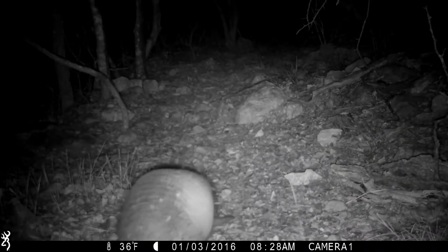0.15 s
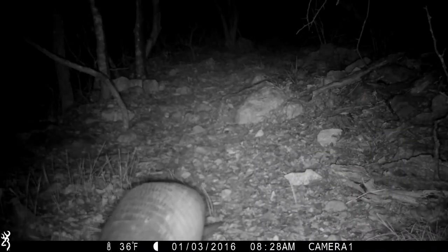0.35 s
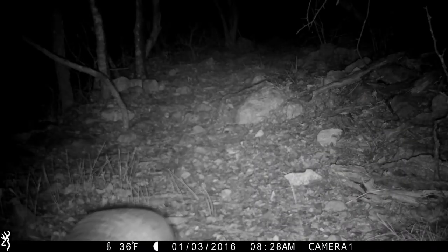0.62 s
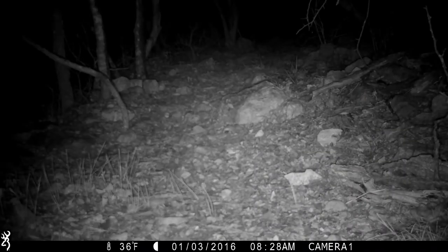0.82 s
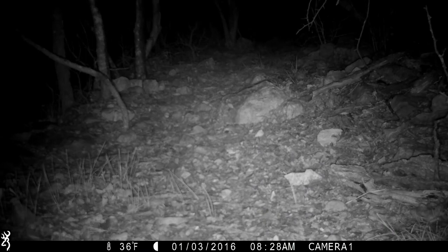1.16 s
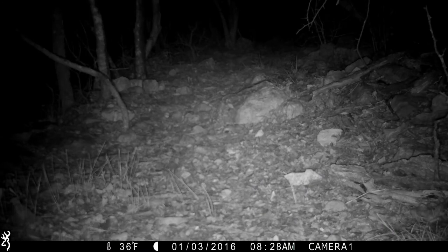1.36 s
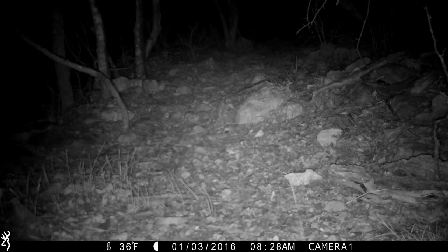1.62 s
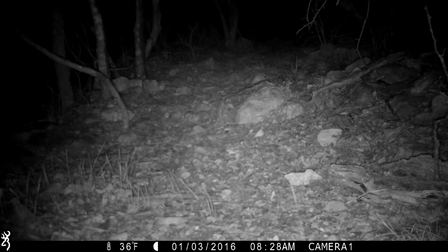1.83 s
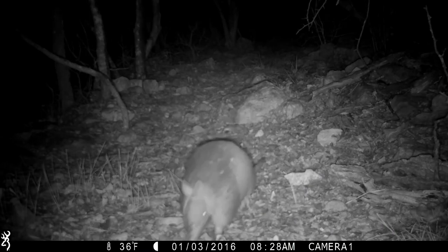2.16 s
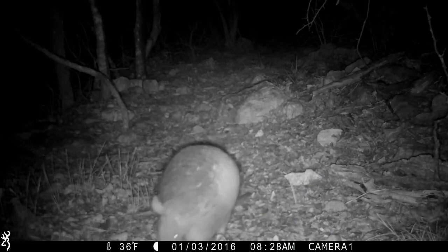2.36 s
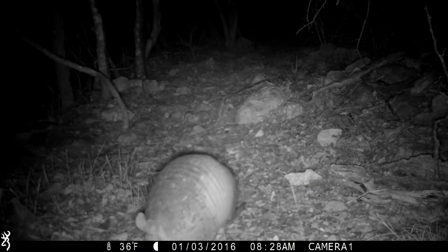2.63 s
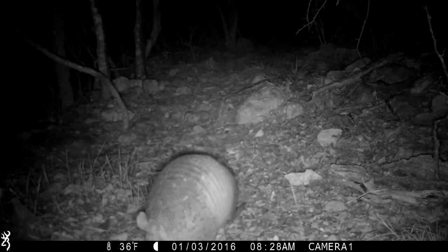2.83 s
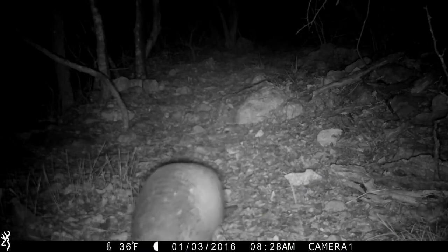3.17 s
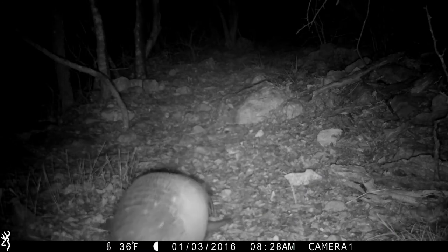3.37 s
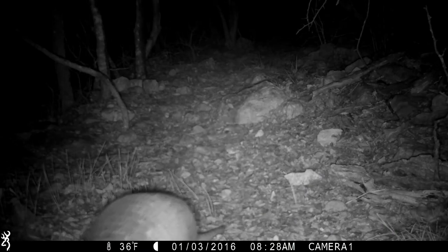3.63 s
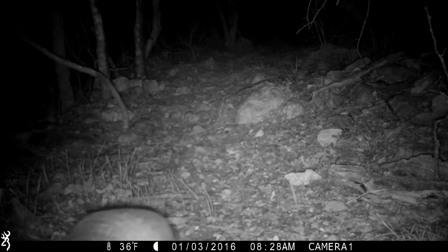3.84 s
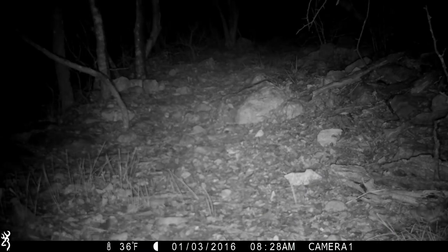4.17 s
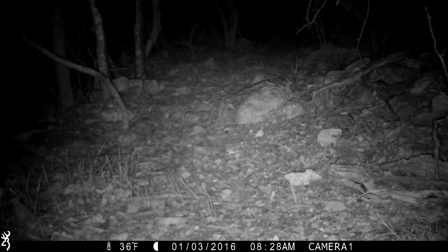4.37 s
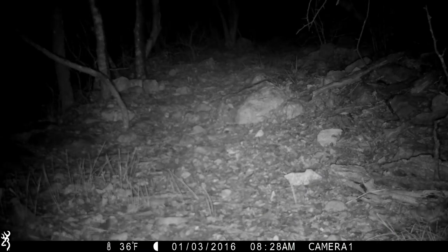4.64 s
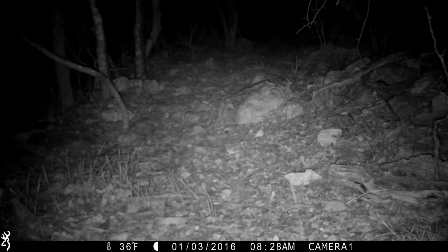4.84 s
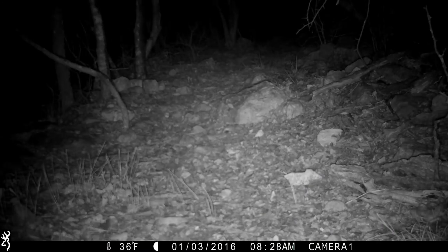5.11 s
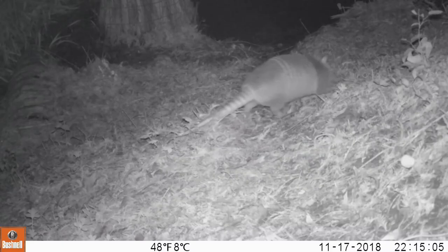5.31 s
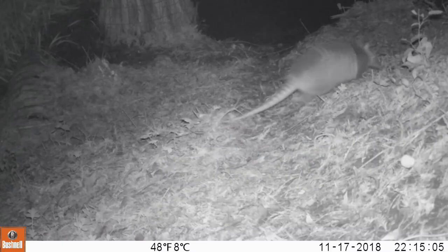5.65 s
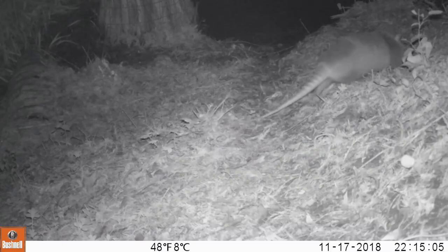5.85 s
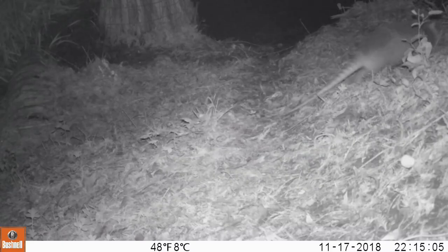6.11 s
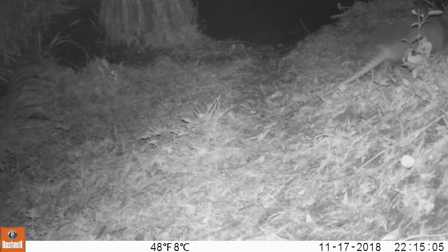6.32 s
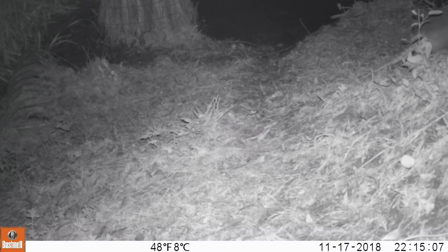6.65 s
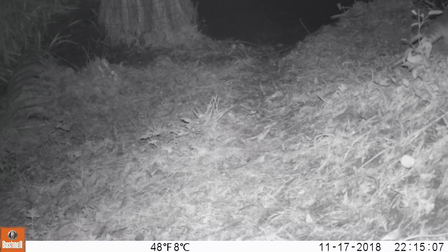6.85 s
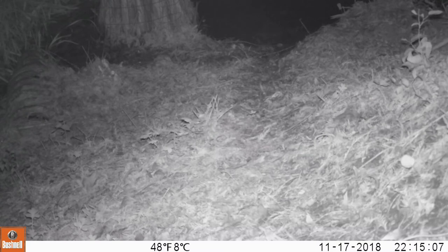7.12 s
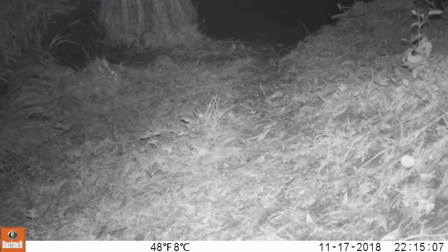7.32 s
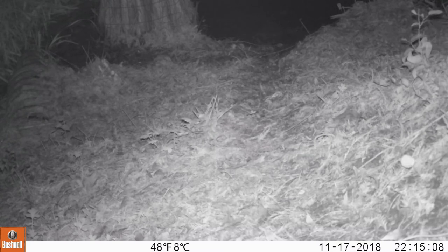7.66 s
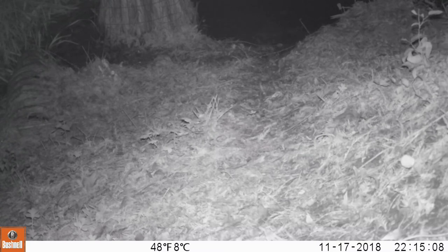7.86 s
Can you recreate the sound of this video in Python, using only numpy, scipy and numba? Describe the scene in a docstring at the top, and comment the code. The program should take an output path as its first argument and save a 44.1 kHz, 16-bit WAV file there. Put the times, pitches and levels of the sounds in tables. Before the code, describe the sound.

Close, crackling footsteps in leaf litter with twig snaps and hollow knocks, abruptly replaced by faint night crickets, distant frogs and light grassy ticks.

```python
"""An armadillo trots through dry leaves at night: crunching steps, sharp snaps and hollow knocks over rumble and hiss.
The end of this passage plays first, then the whole of it, joined by a hard cut. After a short silence a quieter
camera hears crickets, a far frog chorus and the animal rustling away over grass.
Leaves and grass are crowds of tiny ringing grains, snaps and knocks are single short bursts, crickets and frogs
are rows of short falling tones, and the cameras' own sounds are shaped noise."""
import sys
import numpy as np
from scipy import signal
from scipy.fft import rfft, irfft, next_fast_len
from scipy.io import wavfile
from scipy.ndimage import uniform_filter1d, map_coordinates
from numba import njit

SR = 44100
rng = np.random.default_rng(int(sys.argv[2]) if len(sys.argv) > 2 else 0)


def inscribe(sig):
    """Save sig as 16-bit PCM at rate SR to the path in sys.argv[1].

    A 1-D sig is mono; a 2-D sig holds one channel per row.
    Samples are clipped to [-1, 1] before scaling.
    """
    pcm = np.round(np.clip(np.atleast_2d(sig).T, -1, 1) * 32767)
    wavfile.write(sys.argv[1], SR, pcm.astype(np.int16))


N = 351918
T = np.arange(N) / SR
LEAVES_START_S = 1.9196  # when the whole leaf passage begins
TRILLS_S = 5.14  # when the crickets and frogs begin


def undb(db):
    """Turns decibels into gain."""
    return 10 ** (np.asarray(db) / 20)


def on_log(hz, table):
    """Reads (pitch [Hz], level [dB]) points along a log-frequency axis."""
    f, db = np.transpose(table)
    return np.interp(np.log(hz), np.log(f), db)


def colour(x, table):
    """Filters without delay, following (frequency [Hz], level [dB]) points."""
    size = next_fast_len(len(x))
    hz = np.arange(size // 2 + 1) * SR / size + 1e-3
    return irfft(rfft(x, size) * undb(on_log(hz, table)), size)[:len(x)]


def unit(x):
    """Scales a signal to an rms of 1."""
    return x / np.sqrt(np.mean(x ** 2))


def walk(rate):
    """Wandering curve: random levels held for 1 / rate seconds, then smoothed twice."""
    k = int(SR / rate)
    held = np.repeat(rng.standard_normal(N // k + 1), k)
    return 0.85 * uniform_filter1d(uniform_filter1d(held, k), k)[:N]


@njit
def ring(n, start, turn, fade, size):
    """Adds up grains, each a sine that swells quickly and dies away."""
    out = np.zeros(n)
    for k in range(len(start)):
        z, p = size[k] + 0j, np.exp(1j * turn[k] - fade[k])
        for i in range(min(int(8 / fade[k]), n - start[k])):
            out[start[k] + i] += fade[k] * i * z.imag
            z *= p
    return out


def grains(s, hz, cycles, size):
    """Places grains at times s, each lasting about the given number of cycles."""
    fade = 5 * hz / cycles / SR
    return ring(N, (s * SR).astype(np.int64), 2 * np.pi * hz / SR, fade, size)


def hits(table, boost_db, lean):
    """Single bursts peaking at their times; a lean above 1 makes the fall longer than the rise."""
    out, reach = np.zeros(N + 3000), np.arange(-1500, 1500)
    t = reach / SR
    # each burst points up or down at random, give or take a little
    phases = np.pi * rng.integers(0, 2, len(table)) + .6 * rng.standard_normal(len(table))
    for (s, db, hz, ms), phase in zip(table, phases):
        span = ms / 1000 * np.where(t < 0, 1 / lean, lean)
        swell = np.exp(-2 * (t / span) ** 2)
        out[int(s * SR) + reach] += undb(db + boost_db) * swell * np.cos(2 * np.pi * hz * t + phase)
    return out[:N]


def crackle(t0, t1, rate, strength, gain, scatter_db, turns):
    """Random grains, rate per second, most small and a few large; gain(s, hz) shapes them."""
    u = rng.random((int(rate * (t1 - t0)), 5)).T
    s = t0 + (t1 - t0) * u[0]
    lo, hi = strength[0][0], strength[-1][0]
    hz = lo * (hi / lo) ** u[1]
    cycles = turns * (0.33 + 1.14 * u[2])
    size = undb(scatter_db * np.minimum(-np.log(u[3]), 4.5))
    size = size / np.sqrt(np.mean(size ** 2)) * np.sign(u[4] - .5)
    # evens out the energy of long and short grains, and of dense and sparse ones
    same_energy = np.sqrt(40 * hz / cycles / rate)
    return grains(s, hz, cycles, size * same_energy * undb(on_log(hz, strength)) * gain(s, hz))


def bursts(s, at, db, ms):
    """Power of a rounded swell centred on the time at."""
    return undb(db) ** 2 * np.exp(-np.abs((s - at) / (ms / 1000)) ** 2.2)


def night_floor():
    """The second camera's quiet noise floor: coloured noise with a slowly wandering level."""
    # colour of the floor: (frequency [Hz], relative level [dB])
    night = [(12, -40), (20, 6.5), (125, 1), (300, -6.5), (420, -12), (750, -15.5), (1350, -18.5),
             (1780, -18.5), (2250, -12), (2700, -20.5), (3500, -16.5), (5000, -17.5), (9000, -22),
             (12000, -27.5), (15400, -24.5)]
    return unit(colour(rng.standard_normal(N), night)) * undb(-62 + 1.0 * walk(3.08))


def rumble():
    """The first camera's own noise, split in three; the deep and middle parts swell separately."""
    # colour of the noise before the split: (frequency [Hz], relative level [dB])
    noise_colour = [(12, -31.5), (20, 2), (91, 1), (142, -5), (177, -4), (442, -15.5), (483, -16),
                    (3280, -27), (3750, -24), (4100, -54), (5330, -77.5), (9020, -120)]
    # middle part's level before its random swell: (time [s], level [dB])
    middle_level = [(1.92, -46), (2.8, -48.5), (2.9, -50.5), (4.5, -51), (4.7, -48), (5.07, -53.5)]
    noise = colour(rng.standard_normal(N), noise_colour)
    deep = colour(noise, [(85, 0), (125, -40)])
    hum = colour(noise - deep, [(280, 0), (420, -40)])
    hiss = noise - deep - hum
    hum_db = np.interp(T, *np.transpose(middle_level))
    deep = unit(deep) * undb(-48 + 1.5 * walk(5))
    hum = unit(hum) * undb(hum_db + 0.86 * walk(4.7))
    return deep + hum + unit(hiss) * undb(-53)


def trill(pace, past, hz, fall_hz, duty, db, blur):
    """One short falling tone per stroke; blur adds the smear of echoes and of others at the same pitch."""
    scatter_db, slip_rad = 1.2, 1.7  # random spread of strength and of phase step from stroke to stroke
    # past is the share of a stroke already gone when the trills begin
    count = past + np.cumsum(np.interp(T, *np.transpose(pace)) * (T > TRILLS_S)) / SR
    place, stroke = count - np.round(count), np.round(count).astype(int) + 1
    chance = rng.standard_normal((400, 2)).T
    size = undb(scatter_db * chance[0])[stroke]
    slip = np.cumsum(slip_rad * chance[1])[stroke]
    shape = np.exp(-(place / duty) ** 2)
    falling_hz = hz - fall_hz * np.tanh(place / duty)
    tone = unit(size * shape * np.sin(2 * np.pi * np.cumsum(falling_hz) / SR + slip))
    band = [(hz / 2, -80), (hz - 2.1 * fall_hz - 40, -25), (hz - 1.1 * fall_hz, 0),
            (hz + 0.49 * fall_hz, 0), (hz + 3.0 * fall_hz, -25), (2 * hz, -80)]
    smear = unit(colour(rng.standard_normal(N), band))
    return undb(db) * (tone + blur * smear)


def frog_chorus():
    """Far frogs: a steady run of soft pulses, blurred together by many voices and echoes."""
    # pace of the pulses: (time [s], rate [pulses per second])
    pulse_pace = [(5.14, 29.934)]
    return trill(pulse_pace, .424, hz=2015, fall_hz=84.0, duty=.33, db=-79.5, blur=2.6)


def far_croaks():
    """Low croaks: clearer ones are single bursts, the fainter ones behind them are long grains."""
    # clearer croaks: (time [s], peak before a shared trim [dB], pitch [Hz], length before the lean [ms])
    clear_croaks = [(5.4119, -57, 666, 17), (5.4869, -60, 650, 5.8), (5.6354, -60, 610, 7.2),
                    (5.9212, -59.4, 545, 12), (6.4122, -63, 660, 8.2), (6.5281, -61, 615, 4.8),
                    (6.5655, -61, 600, 5.5), (6.7522, -63.6, 530, 5), (7.2314, -61, 537, 3.2),
                    (7.2763, -61, 645, 14), (7.4645, -68, 543, 14), (7.8088, -64.2, 570, 9.4)]
    # strength of the fainter croaks by pitch: (pitch [Hz], relative level [dB])
    faint_strength = [(500, -9), (555, 0.5), (610, -14), (670, 3), (700, 4)]
    steady = lambda s, hz: undb(-80)
    faint = crackle(5.1, 8.9, 64, faint_strength, steady, scatter_db=2.0, turns=35)
    return hits(clear_croaks, -1.7, lean=1.4) + faint


def faint_chirps():
    """A few faint chirps, each one short burst of tone."""
    # (time [s], peak before a shared trim [dB], pitch [Hz], length before the lean [ms])
    chirp_list = [(5.182, -66, 2800, 6.0), (5.238, -65, 2850, 8.2), (5.258, -64, 2850, 5.0),
                  (5.277, -60, 2920, 6.3), (5.29, -65, 2900, 6.0), (5.365, -63, 3000, 6.0),
                  (5.52, -64, 3650, 12.0), (5.568, -68, 2800, 6.0)]
    return hits(chirp_list, -1.2, lean=1.1)


def crickets():
    """Three cricket voices, one falling tone per wing stroke; the high one pauses between phrases."""
    # pace of the wing strokes of each voice: (time [s], rate [strokes per second])
    near_pace = [(5.14, 47.952)]
    far_pace = [(5.14, 46.521)]
    high_pace = [(5.14, 41.19), (5.42, 42.45), (5.47, 53.61), (6.2, 55), (7.77, 52.04), (7.8, 46.59)]
    # middles of the high cricket's pauses: (time [s])
    pauses = [5.439, 5.554, 5.668, 5.888, 6.022, 6.166, 6.306, 6.495, 6.637, 6.79, 6.932, 7.091, 7.217,
              7.365, 7.499, 7.654, 7.792]
    near = trill(near_pace, .143, hz=4553, fall_hz=170.1, duty=0.16, db=-66.5, blur=0.53)
    far = trill(far_pace, .338, hz=4145, fall_hz=179.4, duty=.22, db=-75, blur=1.45)
    high = trill(high_pace, .15, hz=8950, fall_hz=304.3, duty=0.18, db=-69.0, blur=0.33)
    rest_s = .012  # from the middle of a pause out to its edge
    high = high * np.prod([1 - np.exp(-((T - s) / rest_s) ** 4) for s in pauses], axis=0)
    return near + far + high


def swish(s, hz):
    """How hard the grass is brushed at time s: one swell per stride over a steady faint rustle."""
    # strides: (time [s], relative level [dB], time from middle to edge [ms])
    strides = [(5.15, -69, 40), (5.46, -74, 30), (5.69, -67, 30), (5.775, -63, 28), (5.99, -66, 20),
               (6.08, -65, 25), (6.235, -67, 15), (6.345, -62.5, 43), (6.425, -63, 29), (6.65, -66.5, 46),
               (6.77, -68.5, 30), (6.86, -67, 9.6), (7.02, -66, 44), (7.15, -68, 16), (7.28, -69, 50),
               (7.56, -64.5, 45), (7.725, -63.5, 49)]
    return np.sqrt(undb(-69) ** 2 + sum(bursts(s, *row) for row in strides))


def grass():
    """The animal leaving over grass: dense rustling grains, a few stronger ones, and sharp ticks."""
    # strength of the rustle by pitch: (pitch [Hz], relative level [dB])
    straw = [(2500, -13), (4800, -15), (6300, 5.5), (8000, 1), (10500, -2), (13000, -12)]
    # ticks: (time [s], peak before a shared trim [dB], pitch [Hz])
    tick_list = [(5.7693, -47.6, 7780), (5.7897, -44, 8420), (5.8177, -43, 8540), (5.9821, -44, 8630),
                 (6.2316, -44.6, 7020), (6.3206, -46, 8310), (6.3329, -47.1, 7780), (6.3651, -45, 7320),
                 (6.424, -39, 6950), (6.4314, -40, 7040), (6.6198, -48, 8090), (6.7843, -44.5, 6420),
                 (7.1453, -40, 7810), (7.7228, -43.8, 7330)]
    tick_ms = .3  # before the lean
    rustle = undb(4.5) * crackle(5.1, 7.98, 12000, straw, swish, scatter_db=1.5, turns=6.6)
    sparse_band = [(6500, 0), (8800, -1)]
    sparse = undb(-9) * crackle(5.1, 7.98, 60, sparse_band, swish, scatter_db=2.5, turns=4)
    ticks = hits([(s, db, hz, tick_ms) for s, db, hz in tick_list], -2.2, lean=1.9)
    return rustle + sparse + ticks


def second_camera():
    """Frogs, croaks, crickets and grass over a quiet floor, starting abruptly."""
    sound = night_floor() + frog_chorus() + far_croaks() + faint_chirps() + crickets() + grass()
    full_s = 5.134
    opening_s = [full_s - .012, full_s - .0115, full_s - .001, full_s]
    return sound * np.interp(T, opening_s, [0, .15, .2, 1])


def crush(s, hz):
    """How hard the litter is pressed at time s, as heard at each pitch: low thud, high crackle."""
    # footfalls: (time [s], relative level [dB], time from middle to edge [ms], thud against crackle [dB])
    steps = [(2.017, -38, 13.4, -12), (2.079, -53, 36, -8), (2.123, -43.5, 18, -7), (2.143, -43, 4.9, -13),
             (2.179, -48, 21, -6), (2.23, -43, 9.7, -7), (2.348, -41.5, 13, -7), (2.397, -46, 32, -8),
             (2.447, -44, 8.9, -16), (2.502, -47, 31, -8), (2.983, -43, 23.5, -0.5), (3.095, -40, 22.6, -5),
             (3.213, -47.5, 24, -5.5), (3.243, -41, 17, -5.5), (3.367, -42.5, 23, -6),
             (3.515, -41.5, 28, -3), (3.58, -47, 37, -19), (3.607, -42.5, 7.9, -12.5), (3.67, -42, 9, -8.5),
             (3.713, -39, 5.4, -26), (3.799, -41.5, 25, -4.5), (3.84, -39, 5.2, -7),
             (3.922, -34, 37, -16.5), (4.039, -37.5, 17, -31), (4.101, -38.5, 18, -16.5),
             (4.196, -38, 37, -7.5), (4.236, -38, 12, -10.5), (4.304, -42.5, 4.6, -11),
             (4.357, -35.5, 5.1, -10), (4.437, -43, 40, -3), (4.47, -40, 22.6, -2.5),
             (4.581, -46.5, 8.9, -2.5), (4.63, -45.5, 10.2, 4.5), (4.681, -44, 26, -6),
             (4.783, -43.5, 19, -3.5), (4.887, -32.5, 9.9, -11), (4.97, -40.5, 54, -13.5),
             (5.038, -36.5, 20, -11)]
    # leaves stirred between the footfalls: (time [s], relative level [dB])
    stirring = [(1.92, -56), (2.31, -54), (2.65, -61), (3.0, -67), (3.3, -54.5), (4.05, -42.5),
                (4.28, -47.5), (4.72, -49), (5.07, -50.5)]
    # the crackle brightens as the animal comes close: (time [s], dull against bright [dB per octave])
    dullness = [(1.92, 0.5), (2.5, 0.5), (3.2, 0.2), (4.04, 0.6), (4.1, -2), (5.07, -5.5)]
    stir_thud_db = -6  # thud against crackle between the footfalls
    thud = np.clip(np.log2(1400 / hz) / 0.32, 0, 1)
    dull = (1 - thud) * np.clip(np.log2(2600 / hz), -.7, .7)
    power = undb(np.interp(s, *np.transpose(stirring)) + thud * stir_thud_db) ** 2
    power = power + sum(bursts(s, at, db + thud * low_db, ms) for at, db, ms, low_db in steps)
    return np.sqrt(power) * undb(dull * np.interp(s, *np.transpose(dullness)))


def leaf_colour(s, hz, patchy_db, cell_s, cell_octaves):
    """Different leaves favour different pitches, so the colour changes from moment to moment."""
    grid = rng.standard_normal((600, 24))
    cell = [(s - LEAVES_START_S) / cell_s, np.log2(hz / 200) / cell_octaves]
    return undb(patchy_db * map_coordinates(grid, cell, order=1, mode="wrap"))


def leaves():
    """Dry leaves crushed underfoot: a dense crowd of grains that follows the pressing feet."""
    # strength of the grains by pitch: (pitch [Hz], relative level [dB])
    leaf_strength = [(250, -4), (500, -2), (900, -0.5), (1400, -6), (2200, -3.5), (3200, -2), (4200, 7)]
    press = lambda s, hz: crush(s, hz) * leaf_colour(s, hz, patchy_db=2.5, cell_s=.012, cell_octaves=0.395)
    return undb(2.5) * crackle(1.9, 5.1, 9000, leaf_strength, press, scatter_db=2.0, turns=5.0)


def snaps():
    """Twigs and leaf ribs snap: a click, then the broken piece rings briefly; lesser snaps follow the feet."""
    # loudest snaps: (time [s], click peak before a shared trim [dB], click pitch [Hz])
    snap_list = [(2.017, -27, 2400), (2.1187, -25, 2790), (2.137, -20, 2870), (2.169, -31, 2970),
                 (2.2218, -23, 3020), (2.4378, -22.5, 2530), (3.076, -23, 3340), (3.087, -38, 1920),
                 (3.201, -31, 2000), (3.3681, -27, 2520), (3.4141, -27, 3070), (3.6638, -23, 2780),
                 (3.6657, -24, 2530), (3.713, -22, 2730), (3.841, -18.5, 2480), (3.8783, -30, 2530),
                 (3.888, -17.5, 2190), (3.9105, -25, 2290), (3.9158, -27.5, 2580), (3.924, -23, 2730),
                 (3.951, -25, 2460), (4.0283, -25, 3150), (4.034, -18.5, 2680), (4.052, -20.5, 2970),
                 (4.0895, -22, 2640), (4.0923, -10.5, 3140), (4.2312, -20.5, 2930), (4.2386, -23, 3100),
                 (4.2497, -13.5, 3190), (4.3018, -25.5, 3040), (4.3555, -26, 2660), (4.437, -24, 2300),
                 (4.472, -22, 3360), (4.5122, -25.5, 2430), (4.532, -29.5, 2700), (4.576, -27, 2900),
                 (4.6109, -24, 2640), (4.6302, -26, 2250), (4.684, -32, 2910), (4.775, -26, 2380),
                 (4.7952, -24, 3070), (4.8814, -24.5, 2290), (4.8844, -25, 2640), (5.0185, -23, 2760),
                 (5.029, -19, 3130), (5.041, -23.5, 3220), (5.062, -23.5, 3500)]
    snap_ms = .27  # before the lean
    s, db = np.transpose(snap_list)[:2]
    u = rng.random((len(s), 2)).T
    # the ringing piece has a random pitch of its own
    after = grains(s + .0003, 2500 + 1300 * u[0], 5 * (.6 + u[1]), undb(db - 1.5))
    small_band = [(2100, -1), (3400, 0)]
    small = undb(-8.5) * crackle(1.9, 5.1, 300, small_band, crush, scatter_db=1.5, turns=3.5)
    clicks = hits([(at, peak, hz, snap_ms) for at, peak, hz in snap_list], -2.0, lean=1.2)
    return clicks + after + small


def knocks():
    """A foot knocks on wood, stone or packed soil: short hollow bursts of low tone."""
    # (time [s], peak before a shared trim [dB], pitch [Hz], length before the lean [ms])
    knock_list = [(2.9965, -30.5, 550, 1.8), (3.0878, -30, 580, 1.4), (3.1106, -33, 504, 1.4),
                  (3.345, -39, 400, 5.8), (3.5134, -31, 422, 2.5), (3.8204, -28, 402, 0.74),
                  (3.8409, -24.5, 527, 0.29), (3.8807, -28.5, 473, 0.44), (3.9608, -30.5, 530, 1.1),
                  (4.0517, -36.5, 325, 3.9), (4.1701, -29.5, 490, 0.73), (4.2177, -30.5, 660, 1.25),
                  (4.537, -37, 936, 3.2), (4.611, -31, 1274, 1.2), (4.6335, -28, 315, 2.1),
                  (4.636, -28, 140, 6.6), (4.7953, -23.5, 605, 1.9), (5.0023, -29, 514, 0.39)]
    return hits(knock_list, -1.5, lean=1.5)


def first_camera():
    """Leaves, snaps and knocks over rumble, cut off at the camera's band edge; the end also plays first."""
    # upper band edge: (frequency [Hz], level [dB])
    band_edge = [(3750, 0), (3950, -10), (4130, -38.5), (5200, -39), (5600, -91)]
    # swing of the signal's offset as the passage starts:
    # (starting offset [full scale], fall time [s], slow rebound [full scale], rebound time [s])
    settle = (-.016, .035, .011, .15)
    end_s, fade_s = 5.0686, .0004
    passage = colour(leaves() + snaps() + knocks() + rumble(), band_edge)
    age = np.maximum(T - LEAVES_START_S, 0)
    # a very short fade at each end, stopping at 30 percent
    passage = passage * np.clip(np.minimum(age, end_s - T) / fade_s, .3, 1)
    dip, dip_s, rebound, rebound_s = settle
    passage = passage + (dip - rebound) * np.exp(-age / dip_s) + rebound * np.exp(-age / rebound_s)
    a, b = int(LEAVES_START_S * SR), int(end_s * SR)
    return np.concatenate([passage[b - a:b], passage[a:b], np.zeros(N - b)])


def scene():
    """Both cameras one after the other over a trace of hiss."""
    hush = undb(-97.5) * rng.standard_normal(N)
    return (second_camera() + first_camera() + hush)[None]


def record(dry):
    """A steep low-pass filter removes the highest treble."""
    top_hz = 15550
    return signal.sosfilt(signal.ellip(10, .2, 60, top_hz, fs=SR, output="sos"), dry)


dry = scene()
out = record(dry)
inscribe(out)
```